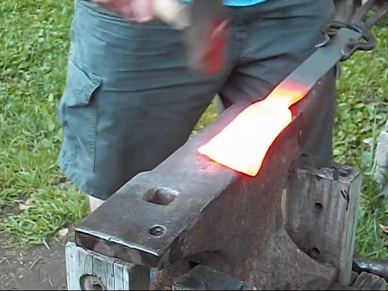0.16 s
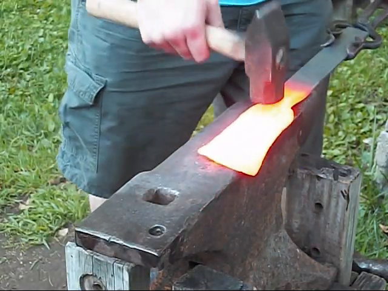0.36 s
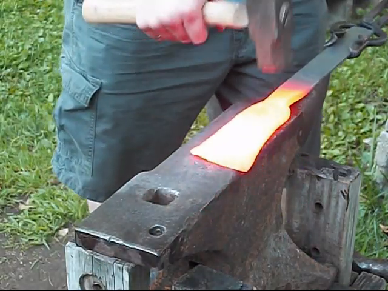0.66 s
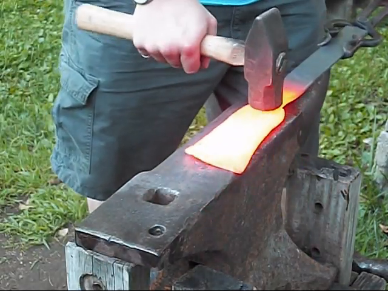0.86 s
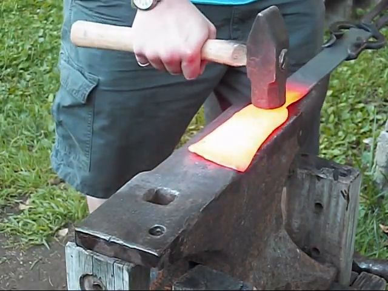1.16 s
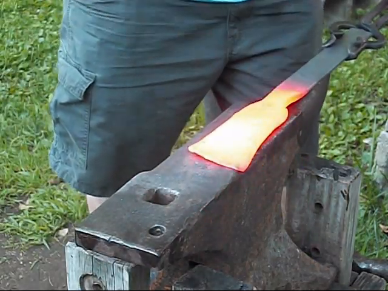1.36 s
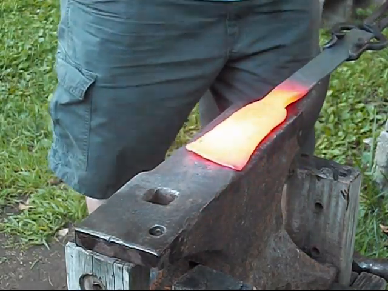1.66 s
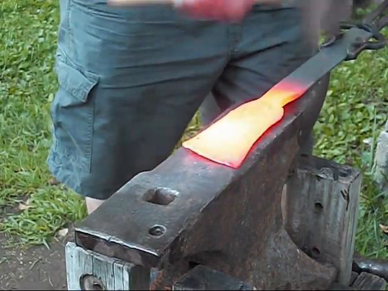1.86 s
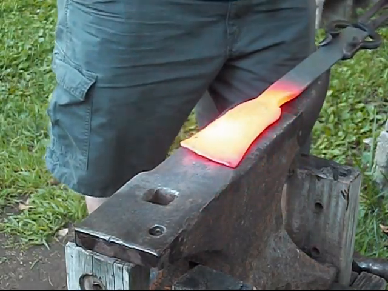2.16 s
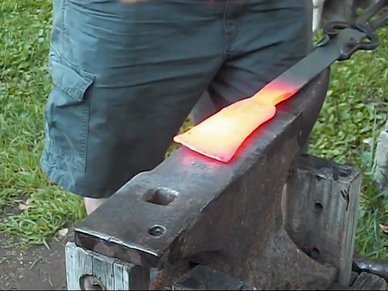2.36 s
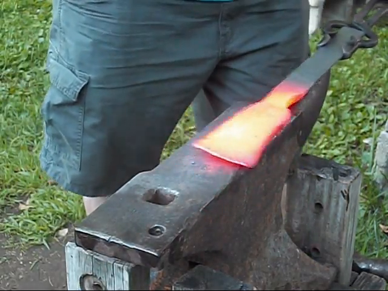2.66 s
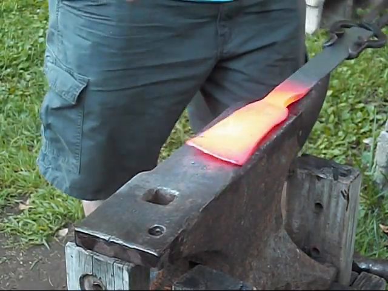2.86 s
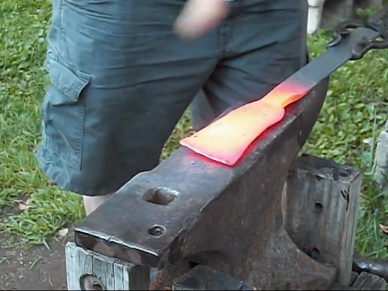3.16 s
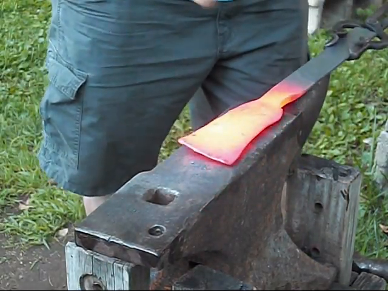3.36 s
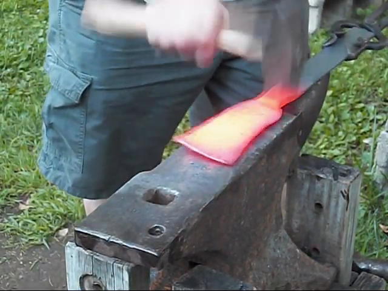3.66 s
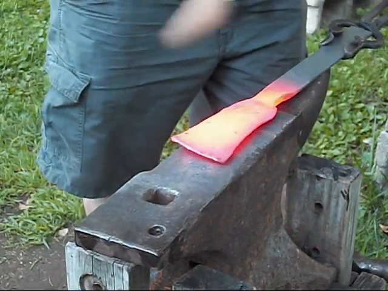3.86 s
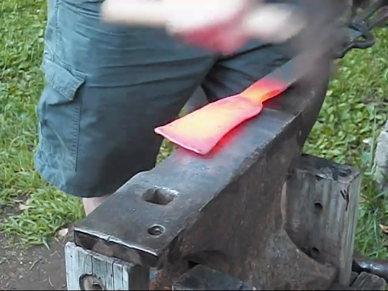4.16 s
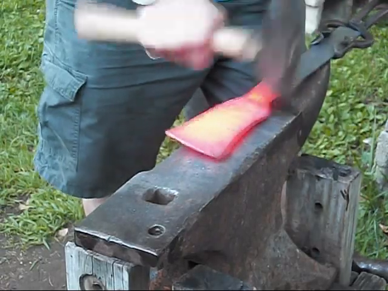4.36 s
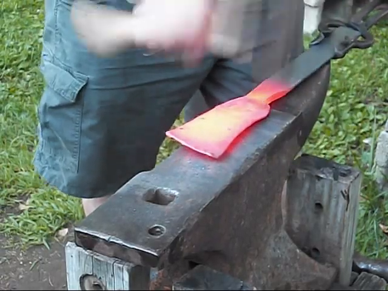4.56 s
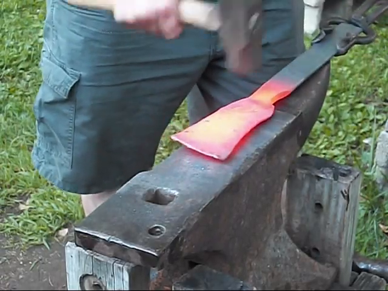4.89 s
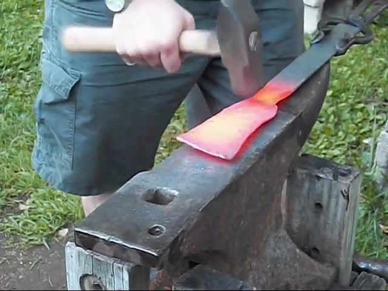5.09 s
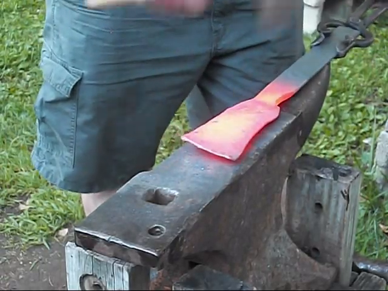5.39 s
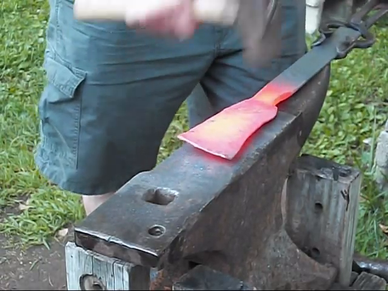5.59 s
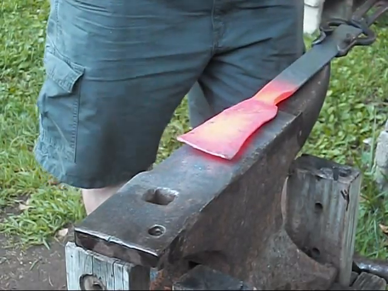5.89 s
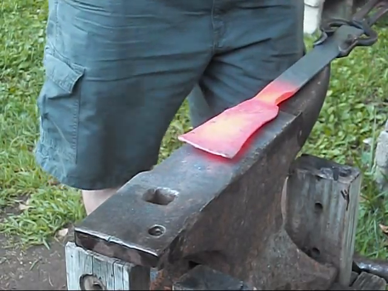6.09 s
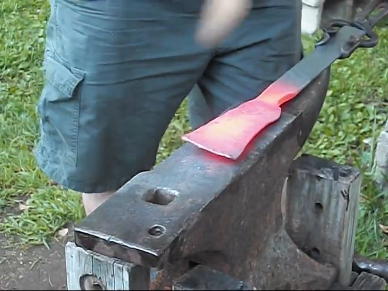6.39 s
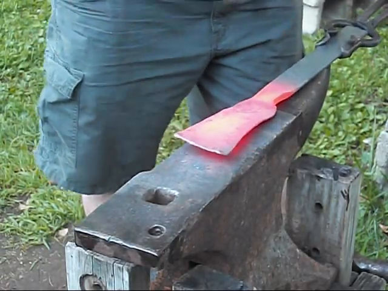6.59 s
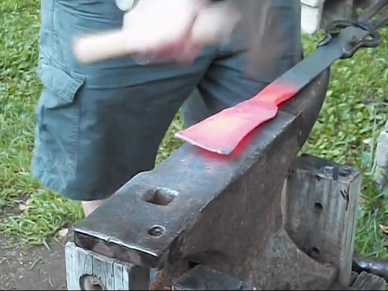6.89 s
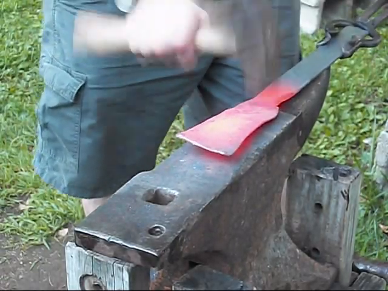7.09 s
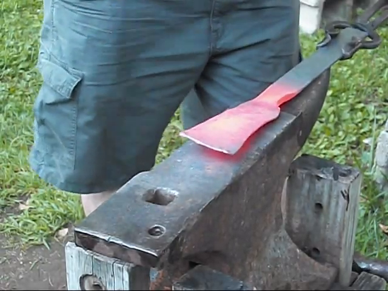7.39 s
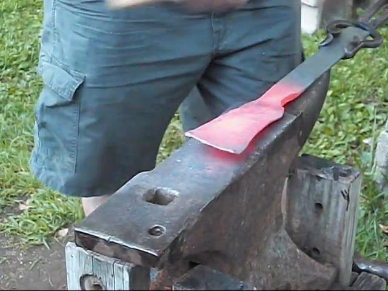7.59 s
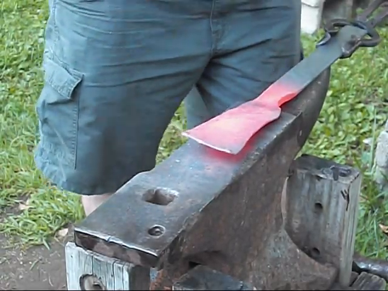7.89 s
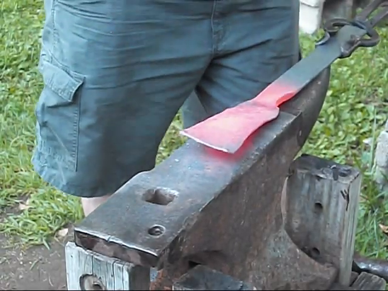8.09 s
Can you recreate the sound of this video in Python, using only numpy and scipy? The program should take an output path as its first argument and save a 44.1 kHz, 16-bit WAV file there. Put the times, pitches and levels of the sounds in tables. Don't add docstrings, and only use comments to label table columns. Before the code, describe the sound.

A hand hammer strikes red-hot steel on a ringing anvil in quick runs outdoors, over the low steady roar of a gas forge.

```python
import sys
import numpy as np
from scipy import signal
from scipy.fft import rfft, irfft, next_fast_len
from scipy.io import wavfile
from scipy.ndimage import uniform_filter1d, minimum_filter1d

SR = 44100
rng = np.random.default_rng(int(sys.argv[2]) if len(sys.argv) > 2 else 0)


def store_wav(level_fs):
    pcm = np.round(np.clip(np.atleast_2d(level_fs), -1, 1) * 32767)
    wavfile.write(sys.argv[1], SR, pcm.T.astype(np.int16))


def natural_amplitude(level_db):
    exponent = np.asarray(level_db, float) / 20
    return 10 ** exponent


N = 363384

# [f/Hz, density level/dB]
ROAR_SPECTRUM = [(15, -65), (25, -29), (88, -13.5), (205, -9.5), (276, 1), (560, -15), (704, -16),
                 (1090, -23.5), (1400, -37), (2970, -44.5), (4190, -48.5), (5030, -40), (5900, -44.5),
                 (7670, -89.5), (13000, -120)]
# [t/s, peak level/dB]
FLAME_POPS = [
    (3.518, -3.5),
    (3.541, -6.5),
]
# [t/s, peak level/dB, f/Hz]
CHIRPS = [
    (0.644, -44, 2940),
    (1.248, -44.5, 2850),
]
# [t/s, peak level/dB, f/Hz]
TICKS = [(0.9574, -21, 2950), (1.696, -2, 3900), (3.4421, -25, 3180), (3.6696, -23, 3270),
         (3.7126, -18.5, 3320), (3.908, -19, 3850), (4.1445, -19.5, 3360), (4.1538, -20, 2500),
         (4.183, -17.5, 3390), (4.201, -17, 3670), (4.2213, -25, 3400), (6.4408, -12, 3700)]

# [t/s, strength level/dB, thud level/dB, short ring level/dB, long ring level/dB]
SQUARE_BLOWS = [(0.5511, -11.5, -37, -37, -47), (0.9386, -3, -39, -41.5, -40),
                (2.4643, 1, -9.5, -6.5, -14.5), (2.7059, 2, -16, -12, -18.5),
                (3.6147, -0.5, -19.5, -24.5, -17.5), (3.8394, 0.2, -10.5, -4.5, -7.5),
                (4.3034, 1.3, -9, -12.5, -24), (4.5336, -0.5, -11, -3.5, -15.5),
                (4.7455, 10, -13.5, -14, -20), (5.494, 0, -14, -12, -11.5), (6.165, 13.5, -15, -15, -10.5),
                (6.839, 6, -17, -10.5, -11), (7.2803, 1.3, -11.5, -4, -4), (7.4991, 3, -11.5, -6, -12.5),
                (7.7226, 10, -11, -11.5, -12.5), (7.9424, 4, -10.5, -9.5, -13),
                (8.1634, -0.8, -6, -3.5, -22.5)]
# [t/s, strength level/dB, thud level/dB, short ring level/dB, long ring level/dB]
GLANCING_BLOWS = [(1.6632, -1, -14, -13, -12), (1.9518, -5, -5.5, -9, -11.5), (2.2152, -4.8, -20, -1, -9),
                  (3.384, -7, -12.5, -14.5, -14), (4.0679, -1.5, -11.5, -12, -23.5),
                  (5.2679, -4, -8.5, -14, -9), (5.7247, 7.5, -17, -12, -9), (5.9456, 7, -22, -9.5, -11.5),
                  (6.3868, -3, -19, -8.5, -0.3), (6.6212, -0.5, -25.5, -5.5, -12),
                  (7.0638, 6, -20.5, -8, -9.5)]
# [f/Hz, density level/dB]
CRACK_SPECTRUM = [(300, -22), (900, 4), (1500, -16), (2200, -7.5), (3200, 2), (4200, -2.5), (5100, 2),
                  (5900, -1.5), (7500, -36)]
# [f/Hz, density level/dB]
RATTLE_SPECTRUM = [(820, -47.5), (1400, -27), (1760, 1.5), (2060, -7.5), (4000, -7.5), (5200, -25),
                   (8800, -120)]
# [f/Hz, level/dB, t60/s]
THUD_MODES = [(70, -5.5, 0.033), (735, 5, 0.02), (904, 11, 0.017), (1080, -11.5, 0.04)]
# [f/Hz, level/dB, t60/s]
BODY_MODES = [(1762, -10, 0.033), (2475, -7.5, 0.03), (3150, -20.5, 0.0033), (3336, -24.5, 0.0033),
              (3798, -5.5, 0.03), (3975, -8.5, 0.06), (4210, -24, 0.017), (4856, -10.5, 0.031),
              (5074, -7.5, 0.084), (4926, -1.5, 0.022), (5200, -37.5, 0.029)]
# [f/Hz, level/dB, t60/s]
SHORT_RING = [(4220, 1.5, 0.1), (4212, -33, 0.33), (4110, -25, 0.065)]
# [f/Hz, level/dB, t60/s]
LONG_RING = [(4773, -1, 0.38)]
# [t/s, length/s, level/dB]
SMEARS = [(1.668, .015, -42), (1.956, .03, -44), (2.222, .014, -44), (3.845, .045, -50), (4.752, .048, -47),
          (5.5, .024, -47), (5.73, .034, -49), (6.628, .061, -48), (6.846, .008, -43), (7.287, .031, -48),
          (7.95, .031, -47)]

FLAME_DB = -18
SQUARE_BITE_MS = 4.1
SLIDE_MS, SLIDE_MS_PER_DB = 6.3, 0.63
BLOW_DB, BODY_DB, CLATTER_T60_S = 10, -21, 0.091
MODE_SPREAD_DB = 3
CRACK_DB, CRACK_T60_S = -4.5, 0.014
RATTLE_DB, RATTLE_T60_S = -31.5, 0.26
SKIP_S, SKIP_DB = 0.014, -26
FLUTTER_DB, FLUTTER_GROWS_S = 4, 0.08
HOLD_DB, GAIN_HOLD_S, ATTACK_S, RELEASE_DB_PER_S = -10, 0.027, 0.0038, 78.5
HISS_DB, HISS_HZ = -53, 4330
STOP_HZ, SPLATTER_HZ = 6200, 15800
TOP_HZ, TOP_GATE_DB = 5250, -56


def t60_decay(t, t60):
    return natural_amplitude(-60 * t / t60)


def drift(rate):
    r = np.exp(-80 * np.pi * rate / SR)
    white = rng.standard_normal(N // 40 + 2002)
    slow = signal.lfilter([1], [1, -2 * r, r * r], white)[2000:]
    return np.interp(np.arange(N) / 40, np.arange(len(slow)), slow / slow.std())


def coloured(spectrum, patchy_db, count):
    hz, db = np.transpose(spectrum)
    size = next_fast_len(N)
    octave = np.log2(np.arange(size // 2 + 1) * SR / size + 1e-3)
    gain = natural_amplitude(np.interp(octave, np.log2(hz), db))
    shaped = rfft(rng.standard_normal(size)) * gain
    centres = np.linspace(4.5, 12.7, count)
    together, out = drift(9), np.zeros(N)
    for k in range(count):
        weight = np.interp(octave, centres, np.arange(count) == k)
        band = irfft(shaped * weight, size)[:N]
        out += band * natural_amplitude(patchy_db * (0.39 * together + drift(12.2)))
    return out / out.std()


def ring(force, hz, t60):
    r, w = t60_decay(1 / SR, t60), 2 * np.pi * hz / SR
    return signal.lfilter([0, np.sin(w)], [1, -2 * r * np.cos(w), r * r], force)


def struck(modes, t, phases):
    out = 0
    for (hz, db, t60), phase in zip(modes, phases):
        out = out + natural_amplitude(db) * np.sin(2 * np.pi * (hz * t + phase)) * t60_decay(t, t60)
    return out


def forge():
    pops = np.zeros(N)
    for s, db in FLAME_POPS:
        pops[round(s * SR)] = natural_amplitude(db)
    soft_pops = signal.sosfilt(signal.butter(2, 700, fs=SR, output="sos"), pops)
    roar = natural_amplitude(FLAME_DB) * coloured(ROAR_SPECTRUM, patchy_db=1.5, count=16)
    return roar + ring(soft_pops, 280, 0.028)


def bird():
    out, t = np.zeros(N), np.arange(3000) / SR
    for s, db, hz in CHIRPS:
        roughness = 1 + 0.51 * np.sin(2 * np.pi * 190 * t)
        tone = np.sin(2 * np.pi * hz * t * (1 + 0.54 * t)) * roughness
        out[round(s * SR):][:len(t)] += natural_amplitude(db) * np.hanning(len(t)) * tone
    return out


def tongs():
    out, t = np.zeros(N), np.arange(1000) / SR
    puffs = rng.standard_normal((len(TICKS), len(t)))
    envelope = np.minimum(t / 0.001, 1) * t60_decay(t, 0.02)
    for (s, db, hz), puff in zip(TICKS, puffs):
        band = signal.butter(2, [0.8 * hz, 1.6 * hz], "band", fs=SR, output="sos")
        a = round(s * SR)
        out[a:a + len(t)] += natural_amplitude(db + 9) * signal.sosfilt(band, puff * envelope)
    return out


def hammer():
    blows = [(*row, SQUARE_BITE_MS) for row in SQUARE_BLOWS]
    blows += [(*row, max(SLIDE_MS - SLIDE_MS_PER_DB * row[1], 2)) for row in GLANCING_BLOWS]
    blows = sorted(blows)
    out = np.zeros(N)
    grit = coloured(CRACK_SPECTRUM, patchy_db=5.5, count=6)
    rattle = coloured(RATTLE_SPECTRUM, patchy_db=1.5, count=6)
    flutter, grain = drift(50), natural_amplitude(4 * drift(150))
    luck = rng.random((len(blows), 8))
    jolts = rng.standard_normal((len(BODY_MODES), N))
    spot_db = MODE_SPREAD_DB * rng.standard_normal((len(blows), len(BODY_MODES)))
    starts = [round((row[0] + 0.002 - row[-1] / 1000) * SR) for row in blows] + [N]
    for k, (s, db, thud_db, short_db, long_db, bite_ms) in enumerate(blows):
        a = starts[k]
        b = min(starts[k + 1] + 500, a + SR // 2 + 8000, N)
        t = np.arange(b - a) / SR - bite_ms / 1000
        after = np.maximum(t, 0)
        rise = natural_amplitude(np.minimum(36000 * t / bite_ms, 0))

        crunch_s = CRACK_T60_S + 0.0023 * bite_ms
        landing_s = SKIP_S * (0.46 + 0.83 * luck[k, 6])
        skip = natural_amplitude(SKIP_DB) * np.exp(-((t - landing_s) / 0.0029) ** 2)
        crack = grit[a:b] * (natural_amplitude(CRACK_DB - 0.5 * bite_ms) * t60_decay(after, crunch_s) + skip)
        tail = natural_amplitude(RATTLE_DB) * rattle[a:b] * grain[a:b] * t60_decay(after, RATTLE_T60_S)

        onset = 1 - np.exp(-after * 4000 / bite_ms)
        thud = natural_amplitude(thud_db) * onset * struck(THUD_MODES, after, 0.5 * (luck[k] > 0.5))

        flutter_grows = np.clip(after / FLUTTER_GROWS_S, 0.2, 1)
        flutter_db = FLUTTER_DB * (flutter[a:b] + 1.0) * flutter_grows
        short = natural_amplitude(short_db + 8.5 + flutter_db) * struck(SHORT_RING, after, 0.25 * luck[k, 4:])
        long = natural_amplitude(long_db) * struck(LONG_RING, after, luck[k, 7:])

        force = natural_amplitude(BODY_DB + 0.85 * short_db) * jolts[:, a:b] * rise * t60_decay(after, CLATTER_T60_S)
        body = 0
        for f, offset_db, (hz, mode_db, t60) in zip(force, spot_db[k], BODY_MODES):
            body = body + natural_amplitude(mode_db + offset_db) * ring(f, hz, t60)

        swell = 1 - np.exp(-after / 0.0064)
        damped = np.clip((b - a - np.arange(b - a)) / 200, 0, 1)
        blow = rise * (crack + tail) + thud + body + swell * (short + long)
        out[a:b] += natural_amplitude(db + BLOW_DB) * damped * blow
    return out


def scene():
    return (forge() + bird() + tongs() + hammer())[None]


def gain_cut_db(x):
    level_db = 10 * np.log10(uniform_filter1d(x ** 2, 200, origin=99) + 1e-12)
    size = max(round(GAIN_HOLD_S * SR), 2)
    level_db = -minimum_filter1d(-level_db, size, origin=(size - 1) // 2)
    ramp = RELEASE_DB_PER_S * np.arange(N) / SR
    held_db = np.maximum.accumulate(level_db + ramp) - ramp
    r = np.exp(-1 / (max(ATTACK_S, 0.001) * SR))
    return signal.lfilter([1 - r], [1, -r], np.maximum(held_db - HOLD_DB, 0))


def smear():
    out, t = np.zeros(N), np.arange(4096) / SR
    edges = np.linspace(6900, 15600, 19)
    kept = rng.random((len(SMEARS), 18)) < 0.6
    white = rng.standard_normal((len(SMEARS), 4096))
    strip = np.digitize(np.arange(2049) * SR / 4096, edges)
    for (s, length_s, db), keep, noise in zip(SMEARS, kept, white):
        hiss = irfft(rfft(noise) * np.r_[0, keep, 0][strip])
        envelope = np.clip(np.minimum(t, length_s - t) / 0.003 + 1, 0, 1)
        out[round(s * SR):][:len(t)] += natural_amplitude(db) * hiss / hiss.std() * envelope
    return out


def top_cut(x):
    return signal.sosfilt(signal.butter(12, 16330, fs=SR, output="sos"), x)


def record(dry):
    hiss_filter = signal.butter(4, HISS_HZ, fs=SR, output="sos")
    hiss = signal.sosfilt(hiss_filter, rng.standard_normal(N))
    x = np.clip(dry * natural_amplitude(-gain_cut_db(dry[0])) + natural_amplitude(HISS_DB) * hiss, -0.8, 0.8)
    x = signal.sosfilt(signal.cheby2(16, 60, STOP_HZ, fs=SR, output="sos"), x)
    top = signal.sosfiltfilt(signal.butter(8, TOP_HZ, "high", fs=SR, output="sos"), x)
    top_db = 10 * np.log10(uniform_filter1d(top ** 2, 1500) + 1e-12)
    x = x - top * np.clip((TOP_GATE_DB - top_db) / 2, 0, 1)
    splatter_filter = signal.butter(4, SPLATTER_HZ, fs=SR, output="sos")
    mix = signal.sosfilt(splatter_filter, np.clip(x, -0.95, 0.95)) + smear()
    return top_cut(mix)


dry = scene()
out = record(dry)
store_wav(out)
```